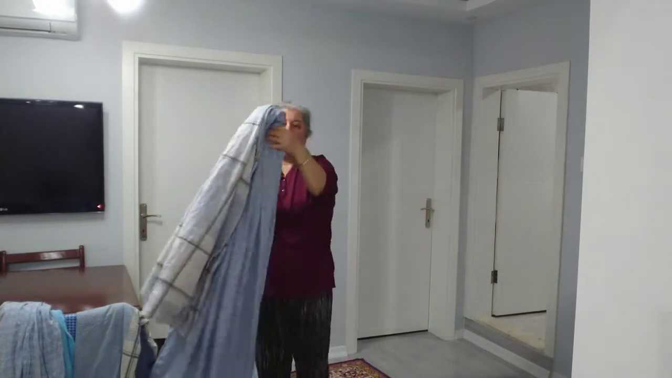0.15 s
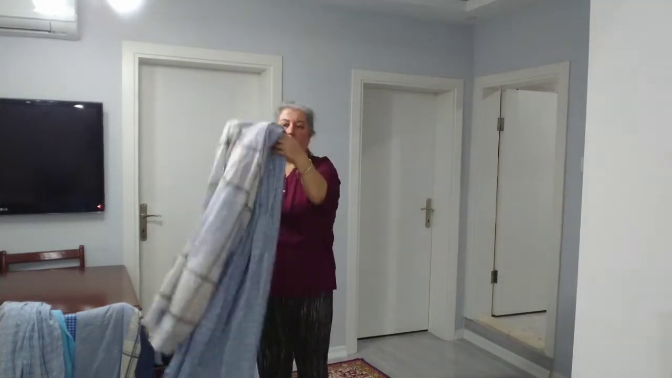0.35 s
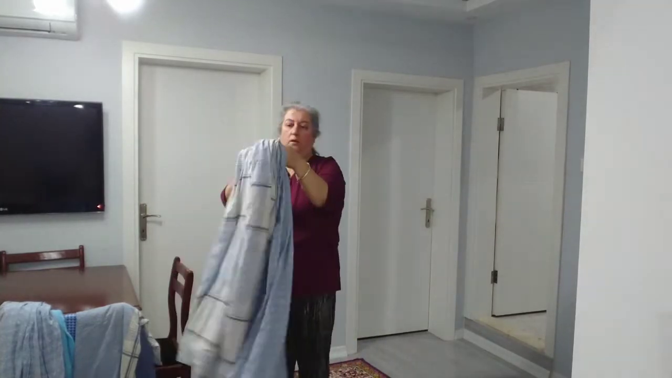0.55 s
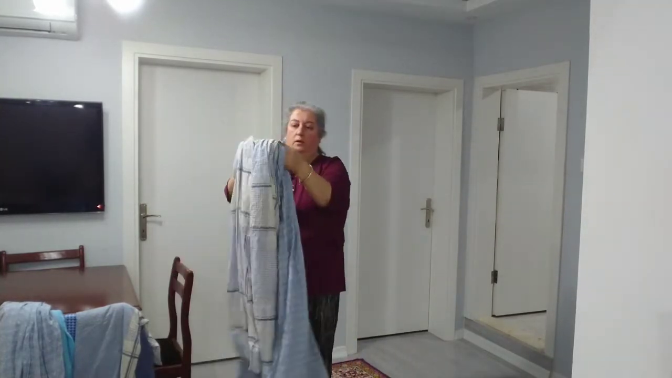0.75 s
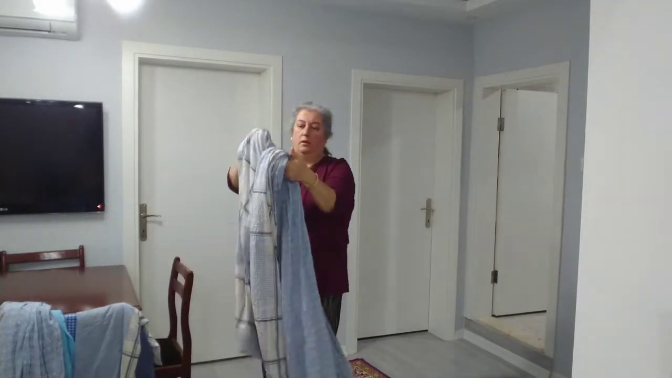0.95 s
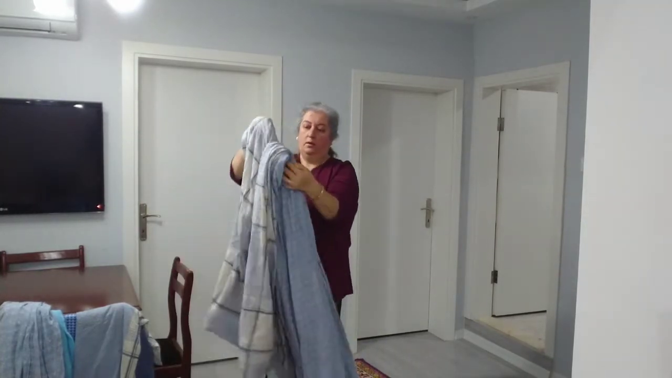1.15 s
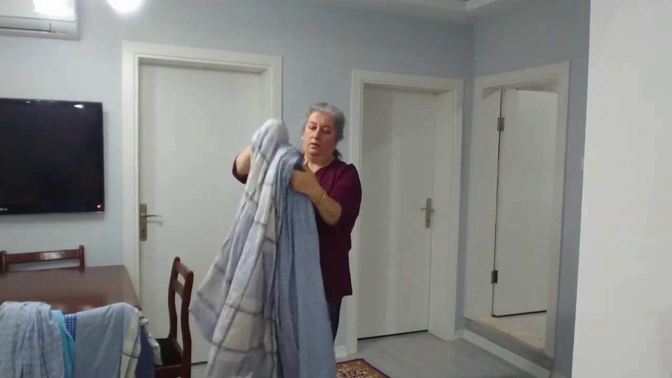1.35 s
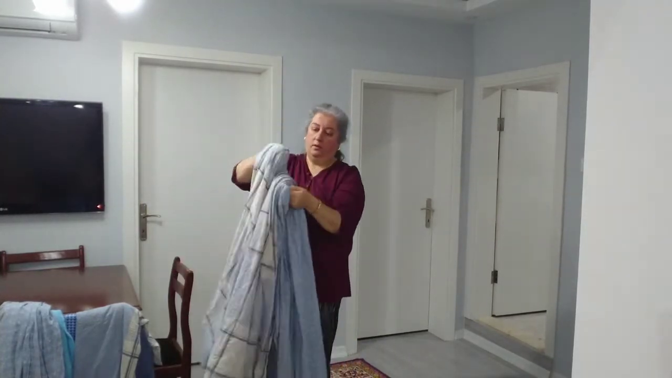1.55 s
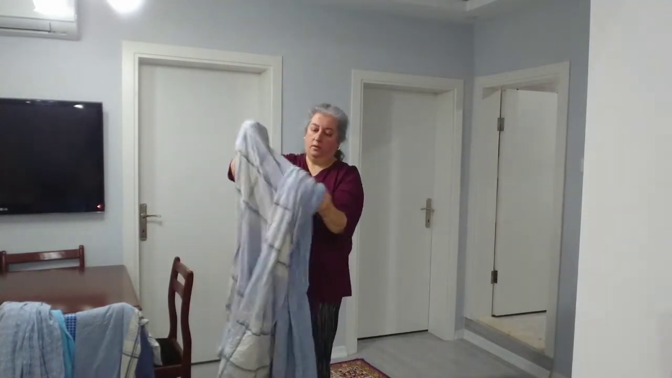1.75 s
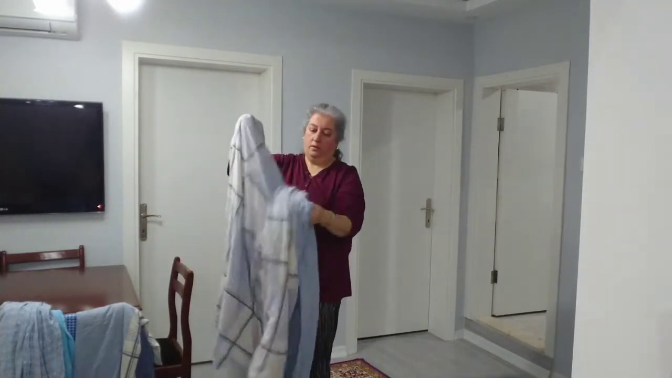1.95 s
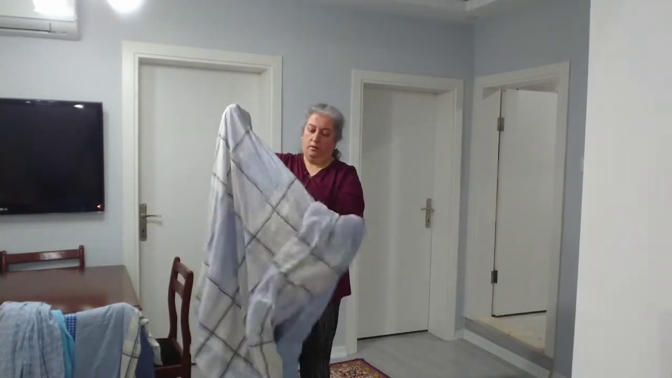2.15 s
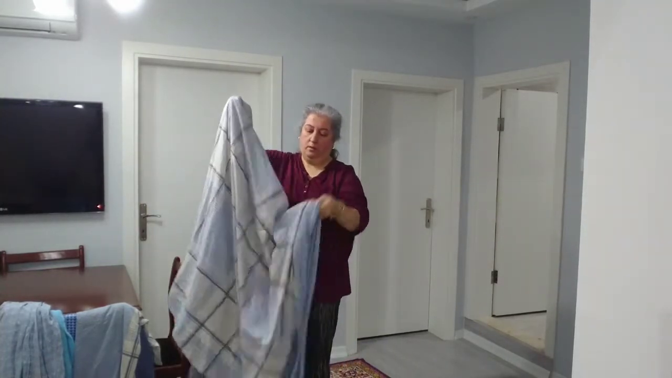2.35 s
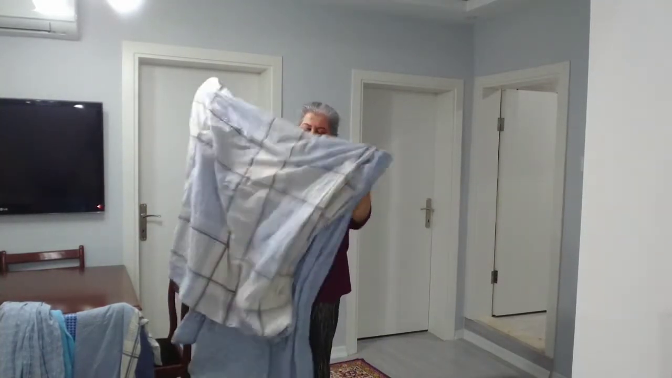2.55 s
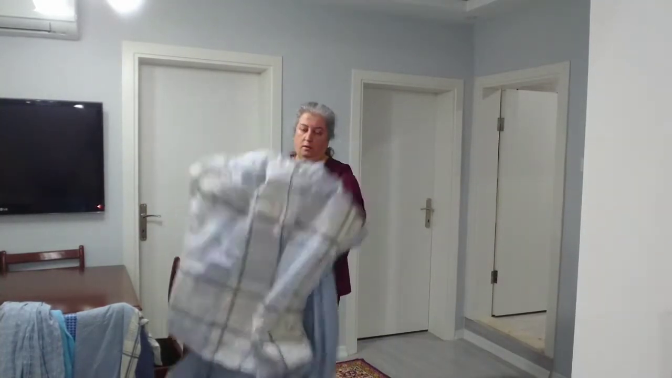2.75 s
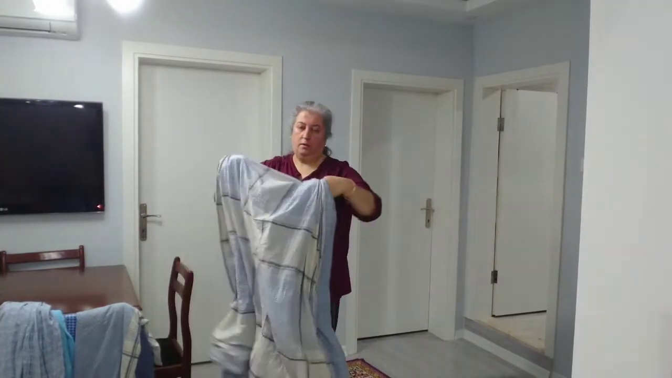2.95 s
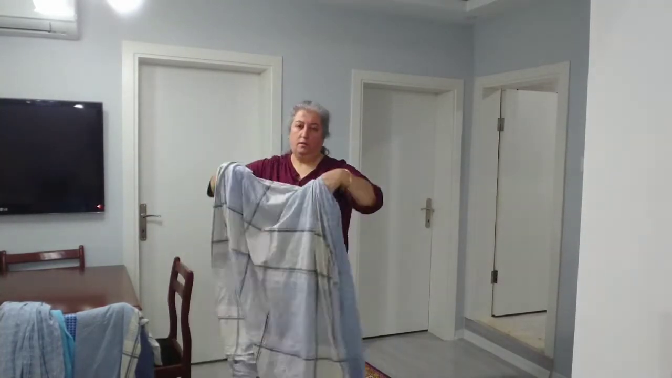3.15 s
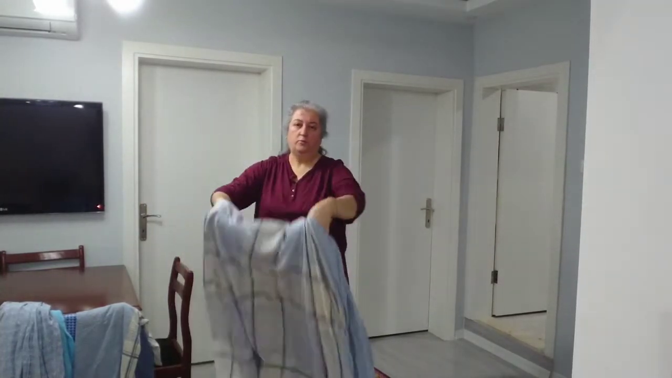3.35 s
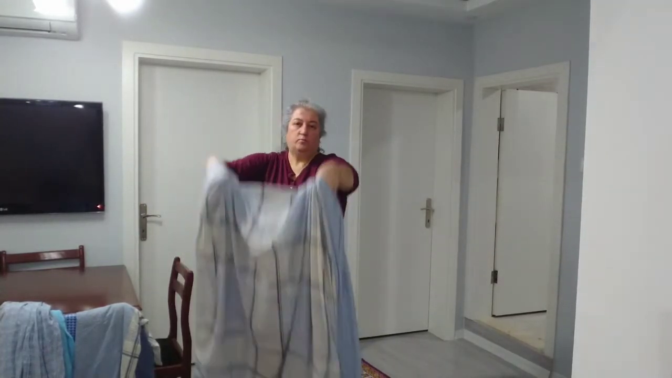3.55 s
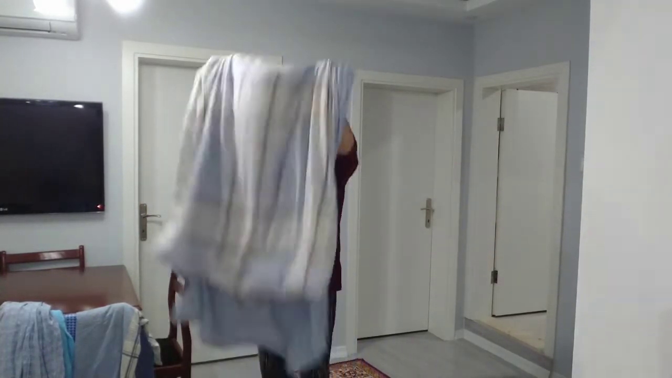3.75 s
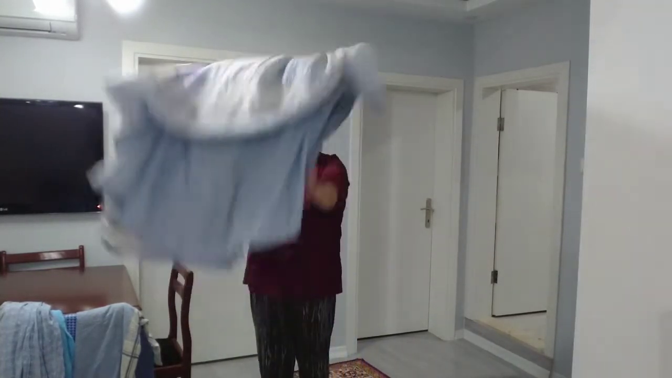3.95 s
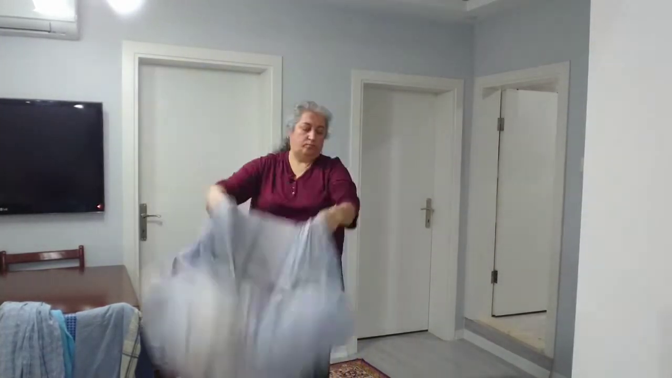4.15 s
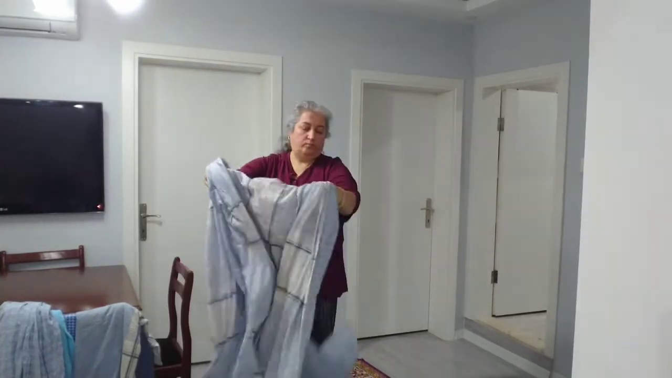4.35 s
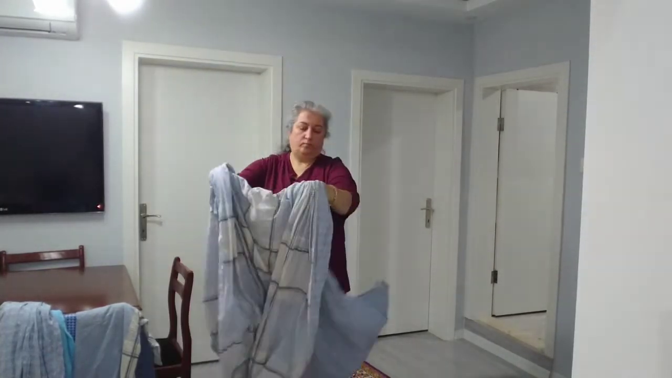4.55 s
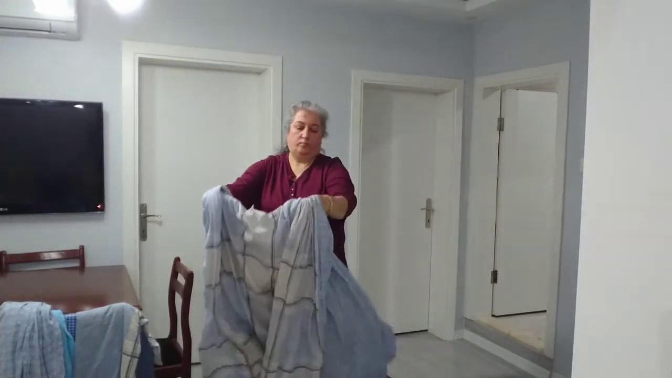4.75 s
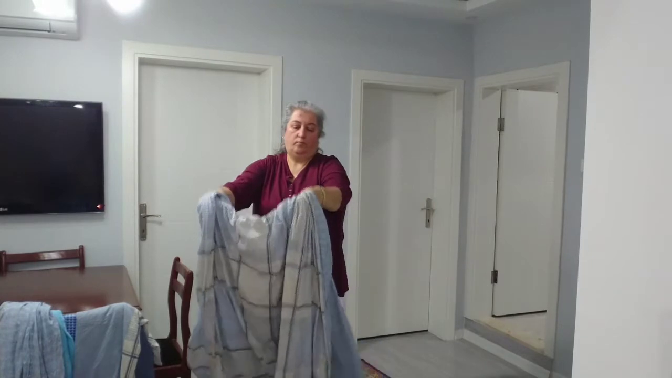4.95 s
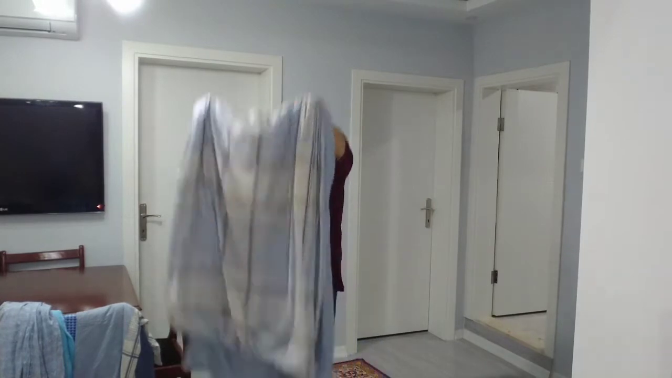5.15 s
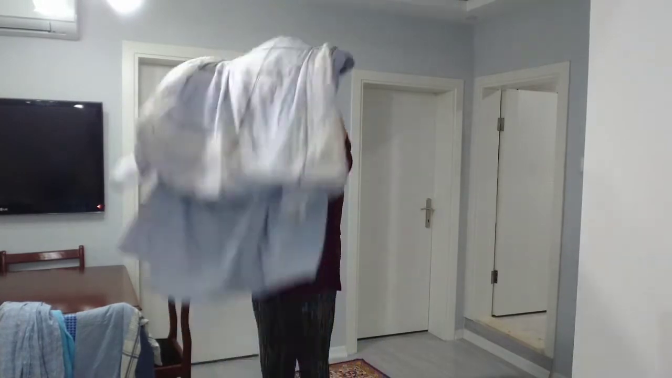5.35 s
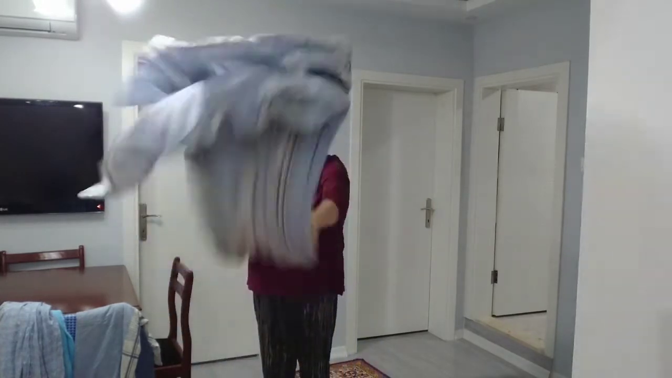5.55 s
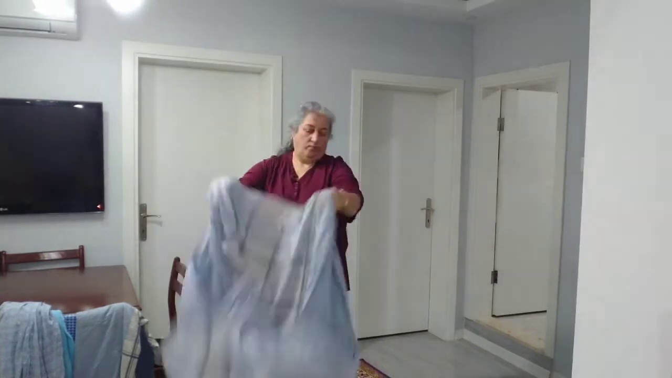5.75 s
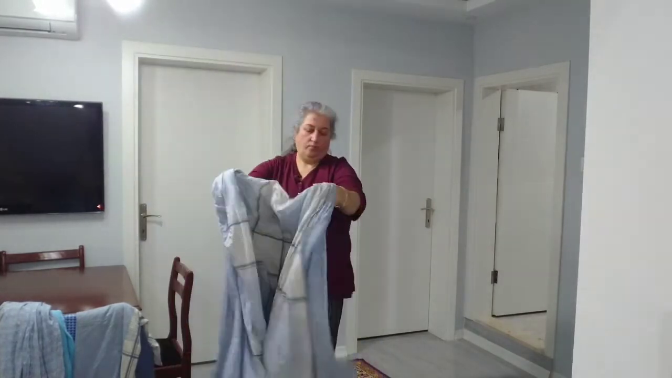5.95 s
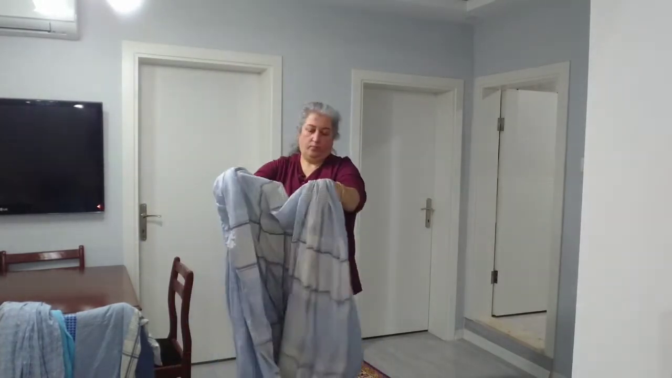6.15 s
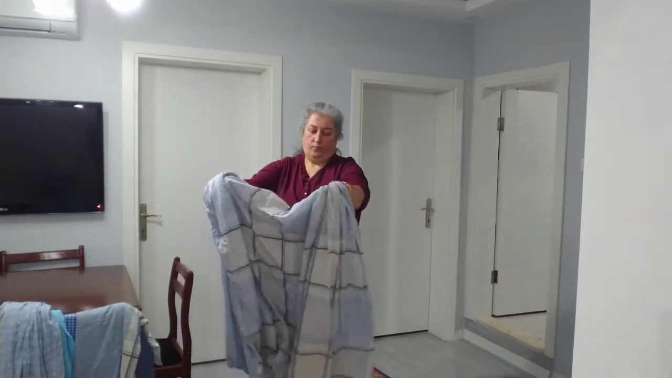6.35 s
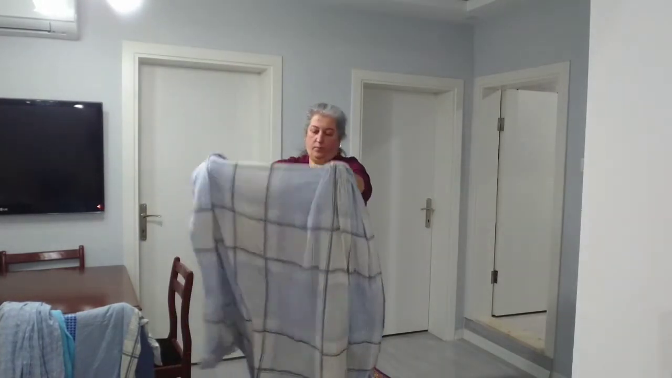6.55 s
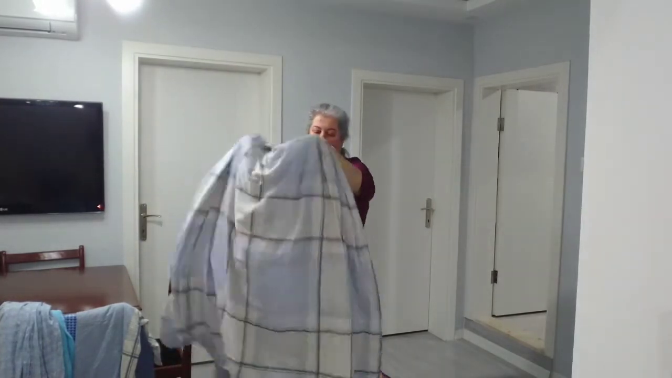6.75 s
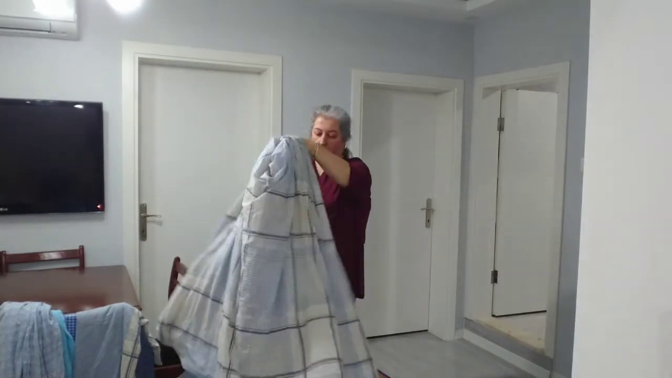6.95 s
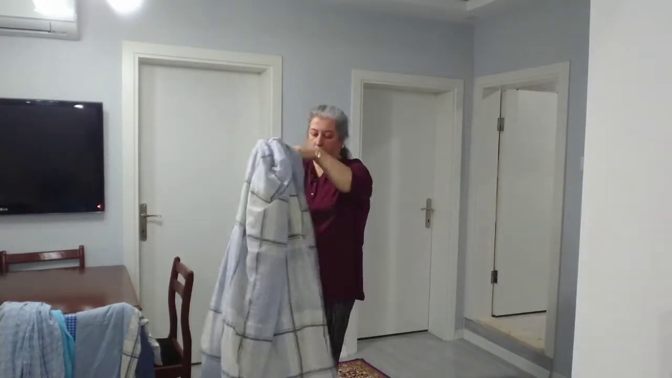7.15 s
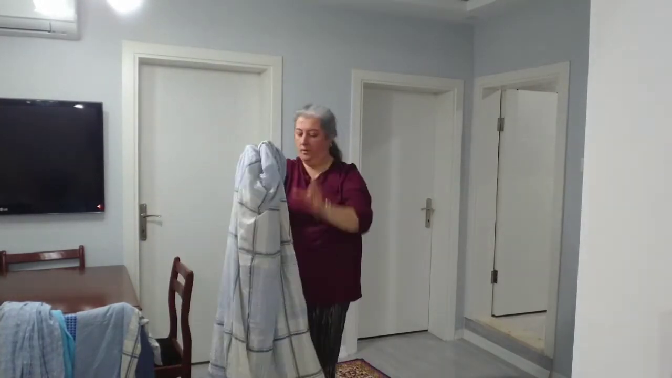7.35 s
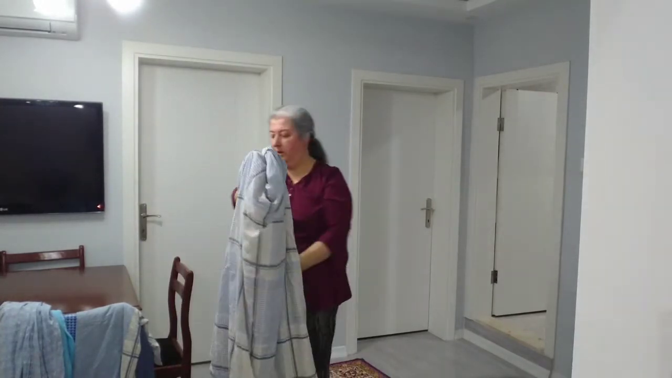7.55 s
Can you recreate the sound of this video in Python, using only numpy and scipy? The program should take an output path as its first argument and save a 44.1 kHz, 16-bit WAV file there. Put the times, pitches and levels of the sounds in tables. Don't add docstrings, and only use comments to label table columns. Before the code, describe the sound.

In a bare, hard-walled room, a person handles a damp sheet a few metres from the microphone. Soft rustles and small bright metal ticks come first, then a huge flap with slaps and an air thump at four seconds, and another at five and a half. Buttons click sharply as the cloth snaps taut, then only faint rustling and jingling remain over a low appliance hum.

```python
import sys
import numpy as np
from scipy import signal
from scipy.fft import rfft, irfft
from scipy.io import wavfile

SR = 44100
rng = np.random.default_rng(int(sys.argv[2]) if len(sys.argv) > 2 else 0)


def how_loud(loudness_db):
    steps = np.asarray(loudness_db, float) / 20
    return 10 ** steps


def output_pcm(signal):
    pcm = np.clip(np.atleast_2d(signal).T, -1, 1) * 32767
    wavfile.write(sys.argv[1], SR, np.round(pcm).astype(np.int16))


N = 335452
BUILD, SETTLE_BUILD = 0.79, 0.02


def evened(x):
    return x / np.sqrt(np.mean(x ** 2) + 1e-20)


def read(points, hz):
    f, value = np.transpose(points)
    return np.interp(np.log(hz + 1), np.log(f + 1), value)


def causal(points, tilt_db=0):
    hz = abs(np.fft.fftfreq(4096, 1 / SR))
    gain_db = read(points, hz) + tilt_db * np.log2(hz / 1000 + .05)
    log_gain = np.log(how_loud(np.maximum(gain_db, -100)))
    return np.fft.ifft(np.exp(np.conj(signal.hilbert(log_gain)))).real[:2048]


def coloured(x, points):
    return signal.oaconvolve(x, causal(points)[None], axes=1)[:, :N]


def ring(x, hz, width_hz):
    r = np.exp(-np.pi * width_hz / SR)
    return 2 * signal.lfilter([1 - r], [1, -r * np.exp(2j * np.pi * hz / SR)], x).real


def pair(length, same, field_db):
    hz = np.fft.rfftfreq(1024, 1 / SR)[:, None]
    s = np.arange(length // 256 + 5) * 256 / SR
    a, b, c, d = rng.standard_normal((len(s), 513, 4)).T
    same = np.clip(read(same, hz), -1, 1)
    left = a + 1j * b
    right = same * left + np.sqrt(1 - same ** 2) * (c + 1j * d)
    z = np.array([left, right]) * how_loud(field_db(hz, s))
    return signal.istft(z, nperseg=1024, noverlap=768)[1][:, :length]


def add(mix, s, sound, pan_db=0, lag=0):
    for side, channel in enumerate(mix):
        part = channel[round(s * SR) + side * lag:][:len(sound)]
        part += sound[:len(part)] * how_loud((.5 - side) * pan_db)


def grains(per_s, spread_db):
    at = 8 + np.flatnonzero(rng.random(N - 16) < per_s / SR)
    size = how_loud(spread_db * np.minimum(rng.exponential(1, len(at)), 5))
    size = size * rng.choice([-1., 1.], len(at))
    out = np.zeros((2, N))
    out[0, at] = size
    np.add.at(out[1], at + rng.integers(-8, 9, len(at)), size)
    return out


def swells(rows, share=1, offset_db=0, build=BUILD):
    s, db, fade_s = np.transpose(rows)[:, :, None]
    late = (np.arange(0, N / SR + .002, .001) - s) / np.maximum(fade_s, .01)
    level_db = share * (db - 20 * np.maximum(late, -late / build)) + offset_db
    return (how_loud(level_db) ** 2).sum(0)


def as_gain(power):
    return np.interp(np.arange(N) / SR * 1000, np.arange(len(power)), np.sqrt(power))


# freq_hz, density_db_per_hz
PUSH = [(15, -40), (25, -9), (48, -5.5), (75, -6), (102, -0.5), (237, 0), (310, -8), (400, -9.5),
        (520, -33.5), (880, -120)]
FLAP = [(80, -35.5), (200, -0.5), (400, -0.5), (800, -7.5), (1400, -14.5), (2500, -25.5), (5000, -46.5)]
RUSTLE = [(500, -44), (1200, -4.5), (2200, 0), (3500, 1), (5500, -7), (8000, -8.5), (11000, -20.5),
          (15500, -23.5)]
HISS = [(2000, -30), (4000, -4), (6300, 0), (8500, -3.5), (11000, -10), (13500, -7), (15500, -9)]
# peak_s, force_db, fade_20db_s
FLAPS = [(1.21, -83, -0.3), (1.7, -62, 0.32), (1.95, -59, .25), (2.22, -60, 0.06), (2.37, -60, 0.43),
         (2.62, -57, 0.41), (2.76, -55.5, 0.38), (3.2, -71.5, 0.2), (3.52, -59, 0.28), (3.845, -52, .04),
         (3.885, -46, .08), (3.96, -26.5, 0.0888), (3.988, -20, 0.1041), (4.1, -49, 0.19),
         (4.15, -33.5, 0.0562), (4.178, -31, 0.1333), (4.225, -41, 0.0935), (5.4, -45, 0),
         (5.469, -36, 0.0962), (5.54, -20.5, 0.1056), (5.64, -36, 0.0931), (5.725, -32.5, 0.0716),
         (5.761, -35.5, 0.0941), (5.87, -54, 0.2), (6.134, -52, -0.01), (6.86, -74, -1), (7.13, -67, -0.1),
         (7.49, -67.5, 0.1)]
# peak_s, force_db, fade_20db_s
SWINGS = [(1.94, -70, -1.5), (2.37, -68, -1.2), (2.85, -61, 0.3), (4.05, -34.5, 0.1534),
          (4.22, -42.5, 0.16), (4.45, -56, .2), (4.6, -53.5, 0.32), (4.8, -60, .12), (5.08, -71.5, 1),
          (5.6, -34.5, 0.1928), (5.76, -33, 0.1336), (5.9, -58, 0.36), (6.2, -69, 0.2), (6.85, -66.5, 0.25),
          (7.2, -69, 0.4), (7.39, -70, 0)]
# peak_s, force_db, fade_20db_s
RUBS = [(1.94, -66, 0.3), (2.5, -59.5, 0.58), (3.335, -59.5, .12), (3.45, -54, 0.07), (3.515, -49, 0.12),
        (3.6, -66, 0.45), (4.63, -67.5, 0.9), (5.3, -70, .2), (6.735, -71, 1.6), (7.25, -70.5, 0.7),
        (7.5, -75.5, 1.5)]
# peak_s, force_db, fade_20db_s
WHIPS = [(3.3, -67.5, .15), (3.99, -50, 0.13), (4.17, -56, 0.07), (5.3, -58, .09), (5.44, -55, .08),
         (5.535, -45, 0.1966), (5.75, -57, 0.2), (4.08, -62, .2), (5.63, -58, 0.18), (2.6, -58, 0.25)]
# peak_s, force_db, fade_20db_s
YANK = [
    (6.15, -43.5, 0.12),
]


def sheet():
    push = swells(FLAPS, share=0.97, offset_db=-10.5) + swells(SWINGS)
    flap = swells(FLAPS)
    rustle = swells(FLAPS, share=0.87, offset_db=-18.5) + swells(RUBS)
    rustle = rustle + swells(YANK, 1.0, -3.5, SETTLE_BUILD)
    hiss = swells(WHIPS) + swells(YANK, .99, -4, SETTLE_BUILD)
    layers = [(push, PUSH, grains(per_s=600, spread_db=3.5)),
              (flap, FLAP, grains(per_s=1500, spread_db=2.5)),
              (rustle, RUSTLE, grains(per_s=6000, spread_db=2.0)),
              (hiss, HISS, grains(per_s=3000, spread_db=3.0))]
    return sum(how_loud(-2.5) * as_gain(power) * evened(coloured(hits, colour)) for power, colour, hits in layers)


# freq_hz, density_db_per_hz
SLAP = [(60, -28.5), (200, -4), (500, 2), (1000, -3.5), (2000, -13), (4000, -25), (8000, -35.5),
        (15500, -52.5)]
# start_s, peak_db, tilt_db_per_octave, pan_db
SLAPS = [(1.642, -45, -3, 3), (1.679, -53, 1, -8), (2.291, -42, -2, -2), (3.514, -48, 6, -10),
         (3.876, -44, 3.5, 3), (3.912, -30, 2.5, -6), (3.967, -6.5, -4, -1.5), (3.985, -10, 2, -6),
         (3.992, -16, -0.9, -17), (4.148, -21, -1, 0), (4.173, -21.5, 4, -5.5), (4.971, -50, 6.5, -1),
         (5.441, -37, 3, -2.5), (5.492, -28, 4.5, -7), (5.528, -10.5, 3, -7), (5.54, -14, 1, 0),
         (5.555, -19, -0.5, -6), (5.695, -30, -1.5, 6), (5.749, -27.5, -0.5, -4.5), (3.324, -46, 5, 3),
         (3.502, -49.5, 4, -3), (3.835, -46, -0.5, -3), (3.848, -44, 0, -3), (3.896, -34, 0, -2.5),
         (3.95, -19.5, -2.5, -3), (5.381, -46, -3, -3), (5.407, -43, 2, -3), (5.501, -20.5, -1, -5),
         (5.724, -30, 1, -3), (5.762, -28.5, -1.5, -3), (4.2, -34, 0, -6)]


def slaps():
    out, t = np.zeros((2, N)), np.arange(600) / SR
    for s, db, tilt_db, pan_db in SLAPS:
        noise = rng.standard_normal(600)
        folds = rfft(noise * np.exp(-t / 0.0035))
        folds = irfft(folds / abs(folds) ** .6, 600) * np.exp(-t / .006)
        burst = np.convolve(folds, causal(SLAP, tilt_db))
        add(out, s, how_loud(db - 4.5) * burst / abs(burst).max(), pan_db + 5.0, round(1.1 * noise[-1]))
    return out


# start_s, peak_db, pitch_hz, length_cycles
THUMPS = [(3.965, -24.5, 104.5, 5.2), (3.97, -22.5, 238, 9.45), (3.985, -25.5, 52.5, 1.68),
          (4.0, -29.5, 140.3, 5.1), (4.16, -39, 51.2, 3), (3.962, -18, 429, 4.1), (3.984, -17, 749, 5.5),
          (5.498, -28, 104, 5.8), (5.53, -31.5, 53, 2.8), (5.55, -34.5, 168, 5.9), (5.724, -31, 138, 6.3),
          (6.126, -49.5, 430, 4.8)]


def thumps():
    out = np.zeros((2, N))
    for s, db, hz, cycles in THUMPS:
        turns = np.arange(0, cycles, hz / SR)
        add(out, s, how_loud(db) * np.sin(2 * np.pi * turns) * np.sin(np.pi * turns / cycles) ** 2)
    return out


# pitch_hz, width_hz, level_db
TRINKET = [(6730, 777, -1), (12380, 283, -4), (13800, 700, -6), (14970, 700, -7)]
# start_s, peak_db, main_ring_hz
TICKS = [(1.1233, -54, 9200), (1.2421, -58, 9400), (1.3274, -55, 8700), (1.7449, -27, 8900),
         (1.8687, -46, 9800), (1.969, -48, 9000), (2.159, -32.5, 8900), (2.5436, -43.5, 9200),
         (2.586, -38, 9040), (2.8916, -35, 8860), (3.187, -46, 9300), (3.3343, -50, 8550),
         (3.8689, -27.5, 8610), (4.129, -40, 8700), (4.242, -39.5, 9170), (4.3694, -45, 8430),
         (5.23, -47, 8900), (5.2985, -45, 9300), (5.8267, -36, 8970), (5.914, -42, 9100),
         (6.5021, -60, 8960), (6.694, -37, 8700), (6.8853, -49, 9200), (7.0932, -49.5, 8800),
         (7.251, -40.5, 8900), (7.3736, -51, 9250), (7.4508, -47, 8800)]
# start_s, peak_db
MORE_TICKS = [(1.0897, -59), (1.2895, -54.5), (1.6721, -56.5), (1.799, -56), (1.9365, -48.5), (1.9844, -47),
              (2.1521, -37), (2.1834, -33), (2.2588, -48), (2.28, -51), (2.5786, -42), (2.8823, -51),
              (3.1742, -43), (3.2186, -45.5), (3.5944, -56), (3.8227, -48.5), (3.882, -36), (4.1994, -42),
              (5.4222, -47.5), (5.6781, -44.5), (5.7754, -43), (6.0473, -55), (4.1098, -45), (4.3445, -40),
              (5.798, -34.5), (5.9386, -40), (6.402, -62.5), (7.212, -55), (6.643, -59), (6.711, -39.5),
              (6.9153, -53), (7.1094, -46.5), (7.228, -47), (7.2745, -38), (7.295, -46)]
SHADED_FROM_S = 6.0


def ticks():
    out, t = np.zeros((2, N)), np.arange(1800) / SR
    more_ticks = [(s, db, 9000 + 180 * rng.standard_normal()) for s, db in MORE_TICKS]
    for s, db, main_hz in [*TICKS, *more_ticks]:
        luck = rng.standard_normal(1800)
        upper_db = -14.5 if s < SHADED_FROM_S else -22
        blow = luck * (np.exp(-t / 0.0013) + 0.21 * np.exp(-t / 0.013))
        tick = evened(ring(ring(blow, main_hz, 650), main_hz, 2500))
        for (hz, width_hz, level_db), u, v in zip(TRINKET, luck[300:], luck[350:]):
            side_db = upper_db + 11.5 if hz > main_hz else .5 * upper_db - 2.5
            side = ring(ring(blow, hz * (1 + v / 60), width_hz), hz, 2000)
            tick = tick + how_loud(level_db + 2 * u + side_db) * evened(side)
        add(out, s, how_loud(db + 1.5) * tick / abs(tick).max(), 1.4 * luck[398], round(.8 * luck[397]))
    return out


# freq_hz, density_db_per_hz
RATTLE = [(2650, -52.5), (4500, -22), (5430, -16.5), (6580, -9.5), (7800, -17.5), (8800, -2), (9350, -1),
          (10000, -19), (10700, -18), (12300, -13), (14900, -12), (15600, -15.5)]
# peak_s, force_db, fade_20db_s
JINGLES = [(2.0, -66, 0.69), (3.2, -59, 0.1), (3.45, -72.5, 0.1), (3.72, -62.5, 0.26), (4.14, -51.5, 0.11),
           (4.255, -49, 0.08), (4.37, -52.5, 0.09), (4.45, -62, 0.13), (5.26, -57, 0.07), (5.3, -54, 0.01),
           (5.7, -54, .15), (5.83, -44.5, 0.14), (5.94, -52.5, 0.17), (6.55, -72.5, 0.7), (7.28, -59, 0.17),
           (7.47, -60, 0.16), (6.92, -67, 0.15)]
# start_s, force_db, fade_20db_s
SHIVERS = [(2.583, -50, 0.13), (3.867, -42, 0.23), (5.226, -58, .3), (6.5, -66.5, .3), (6.695, -53, 0.23),
           (7.452, -56, .16), (5.81, -50, .1), (5.915, -51, .15), (2.893, -56, .12)]


def rattle():
    contacts = coloured(grains(per_s=3000, spread_db=2.2), RATTLE)
    upper = signal.sosfilt(signal.butter(4, 10500, "high", fs=SR, output="sos"), contacts)
    lower = signal.sosfilt(signal.butter(4, 10500, fs=SR, output="sos"), contacts)
    contacts = lower + upper * how_loud(-6.0 * (np.arange(N) / SR > SHADED_FROM_S))
    after_ticks = [(row[0], row[1], 0.13) for row in [*TICKS, *MORE_TICKS]]
    settling = swells(after_ticks, 1, -21.5, SETTLE_BUILD)
    hard_flaps = [row for row in FLAPS if row[1] > -50]
    shaken = swells(hard_flaps, share=0.35, offset_db=-55.5)
    stirred = settling + shaken + swells(JINGLES) + swells(SHIVERS, build=SETTLE_BUILD)
    return how_loud(0.5) * as_gain(stirred) * evened(contacts)


def trinkets():
    return (ticks() + rattle()) * how_loud(2 * np.array([[.5], [-.5]]))


# freq_hz, density_db_per_hz
CLICK = [(1000, -43.5), (2200, -3.5), (4000, -5), (7000, -1), (8800, 8.5), (10200, -7), (13500, 0),
         (15500, -1)]
# start_s, peak_db,
# tilt_db_per_octave
SNAPS = [(6.1445, -17, -.5), (6.1468, -18, -.5), (6.15, -19.5, -.5), (2.4595, -36, 1), (1.7452, -24, 6),
         (1.7475, -33, 8), (3.8682, -29, 5)]


def snaps():
    out = np.zeros((2, N))
    for (s, db, tilt_db), lag in zip(SNAPS, rng.integers(-1, 2, len(SNAPS))):
        click = causal(CLICK, tilt_db)[:400]
        add(out, s, how_loud(db) * click / abs(click).max(), 0, lag)
    return out


# pitch_hz, width_hz, level_db, joins_after_s, lasts_s
CREAK = [(1540, 200, -1.5, 0.00088, .011), (1700, 230, -14, .025, .016), (2940, 220, -2, 0, .034),
         (3750, 300, -4, 0.0079, 0.0088), (4900, 620, -5, 0, 0.018)]


def creak():
    out, t = np.zeros((2, N)), np.arange(2000) / SR
    slips = rng.standard_normal(2000) * (rng.random(2000) < .1)
    for hz, width_hz, db, after_s, lasts_s in CREAK:
        tone = ring(ring(slips * (t < lasts_s), hz, width_hz), hz, 2 * width_hz)
        add(out, 2.459 + after_s, how_loud(-60.5 + db) * evened(tone))
    return out


# time_s, pitch_hz, level_db
SQUEAK = [(5.97, 1590, -81), (5.99, 1540, -66), (6.008, 1530, -75), (6.025, 1530, -65), (6.06, 1506, -71)]


def squeak():
    out, (s, hz, db) = np.zeros((2, N)), np.transpose(SQUEAK)
    t = np.arange(s[0], s[-1], 1 / SR)
    phase = 2 * np.pi * np.cumsum(np.interp(t, s, hz)) / SR
    add(out, s[0], np.sqrt(2) * how_loud(np.interp(t, s, db)) * np.sin(phase))
    return out


def taking_turns(k, rate_hz):
    return np.sqrt(2 / 3) * np.cos(2 * np.pi * rate_hz * np.arange(N) / SR + k * np.pi / 3)


def early(x):
    treble = signal.sosfilt(signal.butter(2, 700, "high", fs=SR, output="sos"), x)
    out = np.zeros((2, N))
    for k in range(3):
        taps = np.zeros((2, 700))
        at = np.geomspace(20, 600, 12).astype(int) + rng.integers(0, 40, (2, 12))
        np.put_along_axis(taps, at, rng.choice([-1., 1.], at.shape) * how_loud(-10.5), 1)
        out += signal.oaconvolve((treble * taking_turns(k, 11))[None], taps, axes=1)[:, :N]
    return out


# freq_hz, t60_s
HALL = [(60, 0.31), (200, 0.36), (600, 0.34), (2000, 0.36), (5000, 0.53), (9000, 0.24), (15000, 0.26)]
# freq_hz, likeness
HALL_SAME = [(60, 0.91), (180, 1), (550, 0.57), (1650, 0.14), (4970, 0.025), (15000, 0.0094)]
# pitch_hz, width_hz, level_db
BOOMS = [(54.9, 3.3, 9.5), (102, 9.7, 0.5), (158, 6.5, 9.5), (220, 10.4, -2), (368.5, 27, -5),
         (405, 39, -6.5), (537, 14.8, -9), (763, 31, 1.5)]


def hall(x):
    out = np.zeros((2, N))
    for k in range(3):
        tail = pair(30000, HALL_SAME, lambda hz, s: -60 * s / read(HALL, hz))
        tail = tail * np.clip((np.arange(30000) / SR - .003) / 0.002, 0, 1)
        tail = tail / np.linalg.norm(tail[0])
        out += signal.fftconvolve((x * taking_turns(k, 7))[None], tail, axes=1)[:, :N]
    booms = sum(how_loud(db) * ring(x, hz, width_hz) for hz, width_hz, db in BOOMS)
    return how_loud(-0.5) * out + booms


# freq_hz, density_db_per_hz
HUM = [(18, -35), (30, -6), (55, -10.5), (114, -15), (137, -9.5), (284, -8), (315, -3), (389, -5.5),
       (546, -10), (606, -8.5), (2240, -14.5), (5590, -24.5), (11300, -32), (13300, -37), (15500, -34.5)]
# freq_hz, likeness
HUM_SAME = [(60, 0.85), (300, 1), (700, 0.48), (1500, 0.36), (3000, 0.21), (8000, 0.07)]
# pitch_hz, width_hz, level_db
DRONES = [(48.6, 5.4, -80.5), (146.1, 12, -78), (222, 19, -83), (288, 5.4, -76.5), (351, 32, -77.5),
          (392.3, 14, -80.5), (616, 15, -89)]
# time_s, level_db
RUMBLE = [(0.0, -72), (0.21, -86), (0.41, -86), (0.57, -71), (0.78, -83), (1.69, -84), (1.91, -71),
          (2.87, -81), (3.37, -80), (3.7, -81)]


def slow_swell(s):
    rates_hz = np.geomspace(.3, 6, 20)
    return evened(sum(np.sin(2 * np.pi * (f * s + rng.random())) / np.sqrt(f) for f in rates_hz))


def hum():
    def wash_db(hz, s):
        level_db = np.maximum(read(HUM, hz), -33 - 60 * (hz < 5000))
        for centre_hz, width_hz, db in [(350.4, 160, 1.7), (2540, 700, 4.5), (6670, 550, 3.8)]:
            level_db = level_db + db / (1 + (2 * (hz - centre_hz) / width_hz) ** 2)
        return level_db + .5 * slow_swell(s)

    wash = how_loud(-66) * evened(pair(N, HUM_SAME, wash_db))
    tones = []
    for hz, width_hz, db in DRONES:
        noise = rng.standard_normal(N)
        tones.append(how_loud(db) * evened(ring(ring(noise, hz, width_hz), hz, width_hz)))
    rumble_db = np.interp(np.arange(N) / SR, *np.transpose(RUMBLE), right=-90)
    tones[0] = tones[0] * how_loud(rumble_db + 80)
    left, right = wash + sum(tones)
    return np.array([np.roll(left, 17) * how_loud(0.1), right * how_loud(2.0)])


def scene():
    direct = how_loud(-2.5) * sheet() + slaps() + thumps() + trinkets() + snaps() + creak()
    centre = direct.mean(0)
    return direct + early(centre) + how_loud(-1.0) * hall(centre) + squeak() + hum()


# freq_hz, level_db
MASKING = [(2800, -45), (3400, -26), (4700, -20.5), (6000, -33), (9500, -33), (10300, -21), (11200, -15),
           (12200, -20), (15000, -18)]
# freq_hz, level_db_per_bin
QUIET = [(12700, -130), (12900, -106), (14500, -107), (15600, -114)]


def gate_treble(x):
    hz, _, z = signal.stft(np.roll(x, -92, 1), SR, "cosine", 2048, 1024)
    power = abs(z[:, :1024].reshape(2, 128, 8, -1)) ** 2
    band_db = 10 * np.log10(power.mean((0, 2)) + 1e-20)
    band_hz = hz[4:1024:8, None]
    peak_db = signal.lfilter([.4, .35, .25], 1, band_db[36:92].max(0))
    whim_db = 3.5 * rng.standard_normal(band_db.shape[::-1]).T
    unmasked = band_db > peak_db + whim_db + read(MASKING, band_hz)
    audible = band_db > read(QUIET, band_hz)
    keep = unmasked & audible | (band_hz < 2800)
    z[:, :1024] *= np.repeat(keep, 8, axis=0)
    return np.roll(signal.istft(z, SR, "cosine", 2048, 1024)[1][:, :N], 92, 1)


# freq_hz, left_minus_right_db
PORTS = [(60, -5.5), (300, -4), (1000, -3.5), (3000, -4), (6000, -3), (9000, -1), (14000, -1.5)]


def ports_and_limits(dry):
    hz = np.fft.rfftfreq(N, 1 / SR)
    lean_db = read(PORTS, hz) * np.array([[.5], [-.5]])
    limits = how_loud(-35 * (hz > 15680)) / np.sqrt(1 + (41 / (hz + 1)) ** 16)
    return irfft(rfft(dry) * how_loud(lean_db) * limits, N)


def top_cut(x):
    return signal.sosfilt(signal.butter(12, 16850, fs=SR, output="sos"), x)


def record(dry):
    mix = gate_treble(ports_and_limits(dry))
    return top_cut(mix)


dry = scene()
out = record(dry)
output_pcm(out)
```